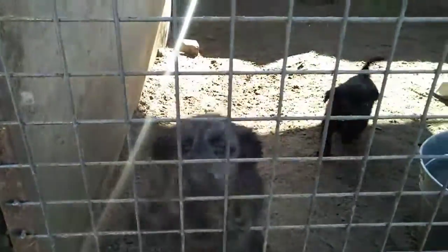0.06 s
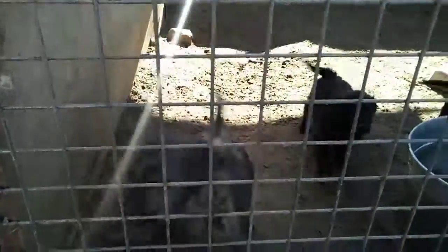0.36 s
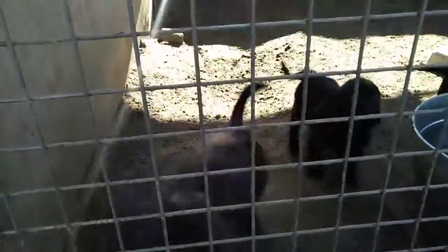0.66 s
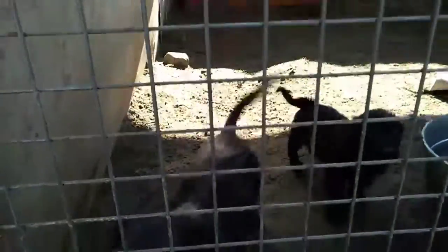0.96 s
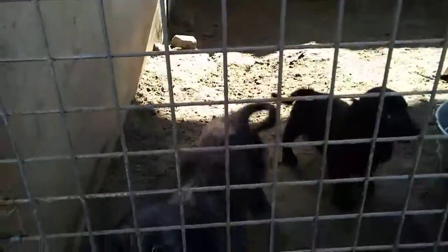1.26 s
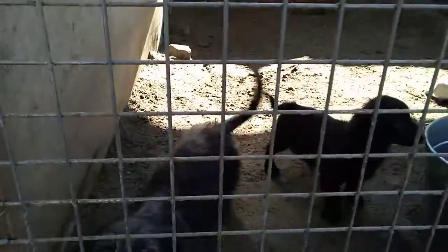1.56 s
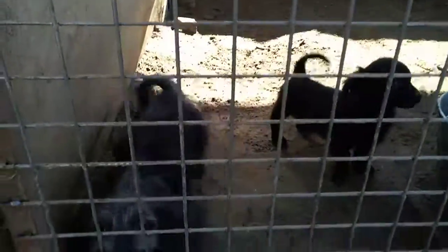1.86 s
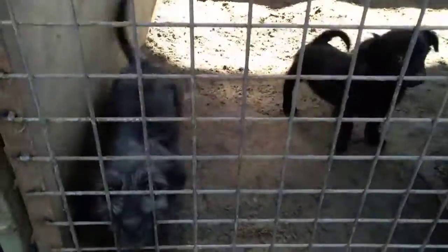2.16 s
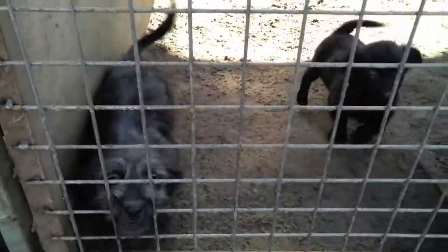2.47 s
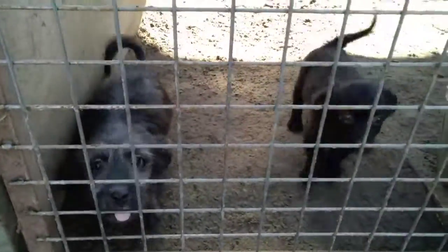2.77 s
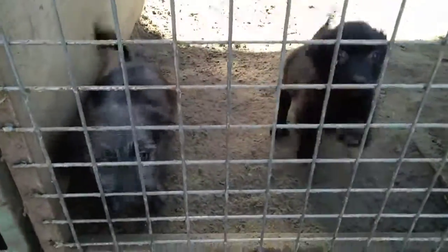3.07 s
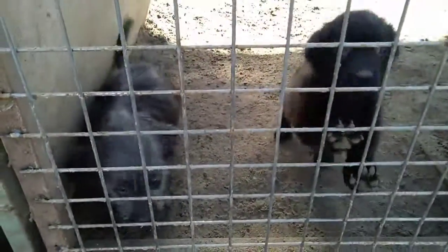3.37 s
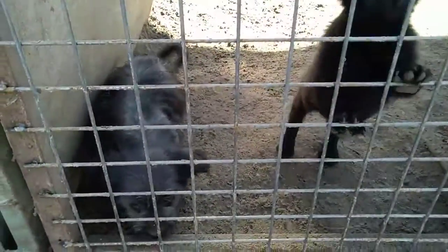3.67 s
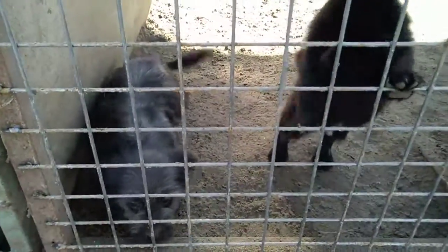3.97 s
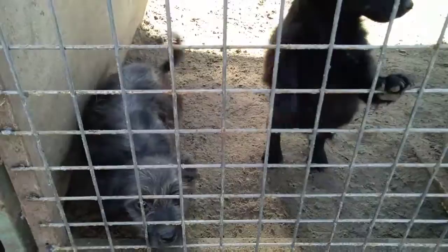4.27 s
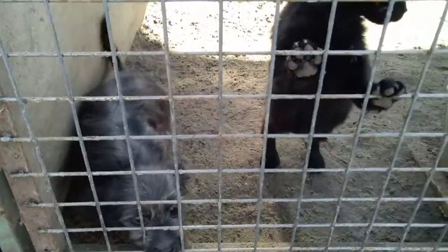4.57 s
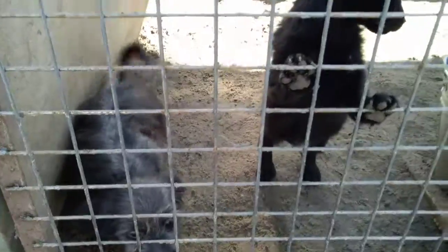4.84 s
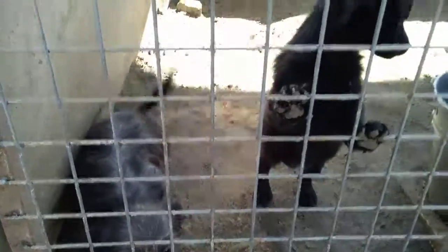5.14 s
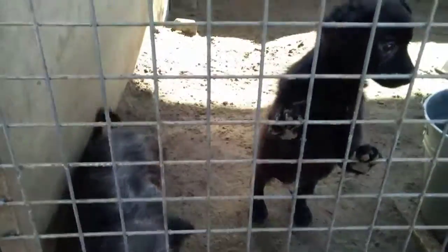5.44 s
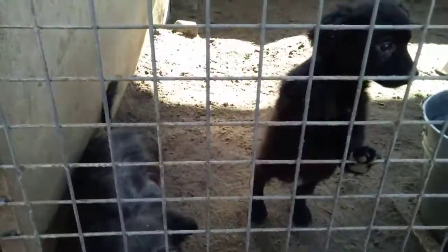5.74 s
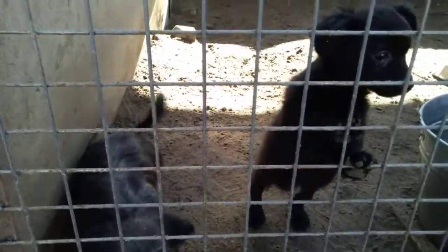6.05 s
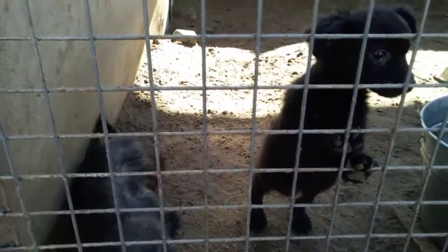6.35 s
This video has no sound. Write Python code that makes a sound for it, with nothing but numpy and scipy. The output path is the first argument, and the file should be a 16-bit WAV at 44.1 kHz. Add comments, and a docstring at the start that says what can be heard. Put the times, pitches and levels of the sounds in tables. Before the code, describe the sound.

Two puppies whine and yelp close to the microphone at a wire kennel fence in a quiet yard. Short whimpers and puffs of breath come first, then a run of thin, high, gliding whines. Paws knock softly on the mesh from about two seconds on. Near the end the calls fade to faint whimpers, paws scuff, a distant bird chirps faintly twice and a low rumble swells.

```python
"""At a wire kennel fence in a quiet yard, two puppies whine and yelp close by.
Their vocal folds give thin gliding tones, filtered by throat, nose and mouth, in a hiss of turbulent air.
Paws knock the mesh into damped vibration and scuff the dirt; the walls add a short reverberation.
A bird chirps faintly twice, and a low rumble swells near the end."""
import sys
import numpy as np
from scipy import signal
from scipy.fft import rfft, irfft, next_fast_len
from scipy.io import wavfile
from scipy.ndimage import uniform_filter1d, map_coordinates

SR = 44100
rng = np.random.default_rng(int(sys.argv[2]) if len(sys.argv) > 2 else 0)


def dump(signal):
    """Clip the signal to [-1, 1] and save it as 16-bit WAV at the path in sys.argv[1]."""
    limited = np.clip(np.atleast_2d(signal).T, -1, 1)
    pcm = np.round(limited * 32767).astype(np.int16)
    wavfile.write(sys.argv[1], SR, pcm)


N = 282681
TOP_HZ = 14250  # upper band limit

# puffs of air through the muzzle: start_s, length_s, t60_s, mouth_huff_db, nasal_hiss_db
BREATHS = [(0.01, 0.25, .3, -70, -59.5), (0.2, 0.011, 0.19, -53, -48), (0.3, 0.1, 0.33, -61.5, -55),
           (0.583, 0.011, 0.31, -42.5, -53), (0.63, 0.083, 0.29, -75.5, -49),
           (0.755, 0.029, 0.22, -57.5, -63), (0.92, 0.025, 0.21, -71.5, -78),
           (1.105, 0.014, 0.21, -76.5, -64), (1.335, 0.02, 0.89, -51.5, -61.5),
           (1.87, 0.057, 0.6, -57.5, -58), (2.165, .13, 0.8, -57, -59), (2.54, 0.063, 0.38, -48, -51.5),
           (2.86, 0.015, 0.21, -51.5, -58), (3.07, 0.025, 0.39, -58, -62), (3.21, .015, 0.3, -73, -62.5),
           (3.305, .03, .15, -99, -63), (3.445, .012, 0.23, -55.5, -51.5),
           (3.545, 0.0162, 0.26, -69.5, -66), (3.7, 0.0404, 0.26, -92, -79),
           (3.875, 0.0089, 0.34, -76.5, -59.5), (3.985, 0.02, 0.27, -85, -69.5),
           (4.315, 0.014, 0.098, -79, -69.5), (4.538, .012, 0.099, -57, -56.5),
           (4.85, 0.038, 0.63, -62.5, -64)]
BREATH_ATTACK_S = 0.053


def whine(contour, second_db, third_db, nose_hz, top_db):
    """Source and filter: tight folds give a strong fundamental; a nasal resonance picks out overtones."""
    # response of throat and nose: frequency_hz, gain_db
    throat = [(1800, 14.5), (2700, 2.5), (3800, 4), (5700, -0.5), (7000, -7.5), (8000, -26.5), (9000, -9),
              (10300, -14.5), (12500, -18), (14200, -33)]
    # mouth openings that lift the second harmonic: start_s, length_s, lift_db
    openings = [(0.201, 0.026, 10.5), (1.339, 0.015, 10), (1.732, 0.12, 18.5), (1.825, 0.054, 24),
                (2.155, .17, 16.5)]
    # hiss inside a whine: frequency_hz, gain_db
    leak_spectrum = [(1500, -17), (2100, -14.5), (3000, -11.5), (4200, -10), (6000, -4.5), (7200, -3),
                     (8200, -11), (11000, -8.5), (14200, -13.5)]
    t = np.arange(contour[0][0], contour[-1][0], 1 / SR)
    n = len(t)
    pitch, first_db, upper_db = curves(contour, t)
    resonance_hz = nose_hz * (pitch / 1000) ** 0.77
    lifts = [lift * envelope(t, s, length, attack=0.0311, fade=0.22) for s, length, lift in openings]
    opened_db = np.minimum(second_db + np.max(lifts, axis=0), first_db + 10)
    # the folds vibrate less evenly at low pitch and while the voice starts or breaks off
    to_edge_s = np.minimum(t - t[0], t[-1] - t)
    slack = 1000 / pitch * (1 + np.exp(-to_edge_s / 0.0034))
    jitter = 0.006 * slack * wobble(450, n)
    quaver = 0.0079 * wobble(70, n)
    pitch = pitch * (1 + jitter + quaver)
    phase = 2 * np.pi * np.cumsum(pitch) / SR
    k = np.arange(1, 21)[:, None]
    upper_hz = k[3:] * pitch
    # each whine starts dull and brightens as the pressure builds
    dull_db = 14 * np.exp(-(t - t[0]) / 0.027)
    throat_db = along(throat, upper_hz * np.sqrt(5200 / resonance_hz))
    throat_db += along([(7000, 0.016), (9000, top_db)], upper_hz)
    throat_db -= dull_db * np.maximum(np.log2(upper_hz / 6000), 0)
    nose_db = 9 * np.exp(-((upper_hz - resonance_hz) / 520) ** 2)
    # the moving muzzle makes every overtone come and go
    flutter_db = 3 * np.array([wobble(35, n) for _ in k[1:]])
    low = amp([first_db, opened_db + flutter_db[0] / 2, upper_db + third_db + flutter_db[1]])
    high = amp(throat_db + nose_db + flutter_db[2:]) * (upper_hz < TOP_HZ)
    high = high / np.linalg.norm(high, axis=0) * amp(upper_db)
    # the more air is puffed past the folds, the raspier the voice
    airy = np.minimum(strokes(BREATHS, BREATH_ATTACK_S, t)[1] / amp(first_db), 0.4)
    rasp_db = 4 * airy * wobble(450, n)
    tremor_db = 1.5 * wobble(40.64, n)
    period_doubling = 1 + 0.56 * airy * np.cos(phase / 2)
    # turbulence frays the highest overtones into narrow bands of noise
    fray_depth = (0.8 + 4 * airy) * slack * (k * pitch / 13000) ** 2
    fray = fray_depth * np.array([wobble(700, n) for _ in k])
    tone = np.sqrt(2) * np.sum(np.vstack([low, high]) * np.sin(k * phase + fray), axis=0)
    leak = amp(upper_db - 21 - dull_db / 2) * noise(leak_spectrum, n)
    gate = np.clip(to_edge_s / 0.0044, 0, 1)
    return (tone * amp(rasp_db + tremor_db) * period_doubling + leak) * gate


def yelp(length, start_hz, middle_hz, end_hz, level_db, fall_db, roughness):
    """Mouth formants shape a harmonic series; random pitch and amplitude modulation roughen it."""
    # response of the open mouth: frequency_hz, gain_db
    mouth = [(350, -1.5), (600, 4), (1350, 1.5), (1900, -3.5), (2500, -31.5), (4200, -9.5), (7000, -38),
             (14000, -64)]
    pitch, swell = arch(length, start_hz, middle_hz, end_hz)
    n = len(pitch)
    waver = roughness * (0.05 * wobble(500, n) + 0.04 * wobble(70, n))
    phase = 2 * np.pi * np.cumsum(pitch * (1 + waver)) / SR
    k = np.arange(1, 10)[:, None]
    gains = amp(along(mouth, k * pitch) - fall_db * (k - 1))
    tone = np.sum(gains * np.sin(k * phase), axis=0)
    shimmer = amp(1.7 * roughness * wobble(350, n))
    return amp(level_db + 3.5) * swell * unit(tone * shimmer)


def voices():
    """The puppies' whines and yelps add by linear superposition."""
    # one contour per whine, each point: time_s, pitch_hz, fundamental_db, upper_overtones_db
    contours = [
        [(0.187, 469.7, -42, -61.5), (0.213, 534.8, -34, -46), (0.255, 692, -38.5, -47.5),
         (0.313, 752, -47.5, -45), (0.369, 701, -42, -50.5), (0.378, 780, -69.5, -65.5)],
        [(1.347, 1214, -36, -62), (1.367, 1232, -36.5, -54.5), (1.391, 1290, -29, -60.5),
         (1.477, 1272, -25.5, -56), (1.533, 1270, -32.5, -59.5), (1.545, 1250, -32.5, -46),
         (1.595, 1243, -28.5, -47), (1.643, 1247, -27.5, -46.5), (1.695, 1161, -37, -42),
         (1.777, 1178, -34.5, -37.5), (1.859, 1060, -42, -40), (1.897, 941, -40.5, -43)],
        [(2.143, 1099, -50.5, -64), (2.167, 1113, -42, -61), (2.265, 1146, -32.5, -44.5),
         (2.309, 1079, -42, -52), (2.415, 915.2, -37, -44.5), (2.441, 889, -36, -50),
         (2.513, 786.3, -38.5, -47.5), (2.555, 778, -37, -41.5), (2.621, 756, -37, -50), (2.65, 738, -52, -63)],
        [(3.06, 637, -51, -72), (3.112, 833, -42.5, -57), (3.128, 1044, -38.5, -49.5),
         (3.15, 1065, -39.5, -48.5), (3.174, 948, -43.5, -49.5), (3.224, 998, -42.5, -52)],
        [(3.455, 995.1, -46, -49.5), (3.471, 1149, -44.5, -43), (3.489, 1139, -37.5, -46),
         (3.507, 1243, -38.5, -50.5), (3.551, 1127, -39, -49), (3.57, 1161, -62, -76)],
        [(3.878, 991.3, -77, -43), (3.898, 1163, -39.5, -60.5), (3.928, 1195, -40.5, -49),
         (3.98, 1216, -38.5, -53.5), (4.005, 1167, -60, -65)],
        [(4.548, 974, -60, -49.5), (4.558, 993, -52, -46), (4.568, 1143, -36.5, -49),
         (4.58, 1163, -37.5, -52.5), (4.592, 1226, -36.5, -47), (4.624, 1272, -39.5, -42.5),
         (4.638, 1285, -37.5, -44.5), (4.68, 1267, -36, -40), (4.832, 1278, -35, -39),
         (4.864, 1239, -34.5, -44), (4.876, 1188, -34.5, -48), (4.888, 1200, -60, -52)],
    ]
    # timbre of each whine: second_harmonic_db, third_re_upper_db, resonance_at_1khz_pitch_hz, top_lift_db
    timbres = [(-55, -16, 7400, -4.5), (-55, -13.5, 4520, -4), (-58.5, -11.5, 4900, 3),
               (-63.5, -23, 6000, 1.5), (-64, -15, 5300, 3.5), (-58, -14, 4700, 4), (-61, -6, 4680, -8)]
    # yelps and whimpers:
    # start_s, length_s, start_hz, middle_hz, end_hz, relative_db, fall_per_harmonic_db, roughness
    yelps = [(0.014, 0.062, 987, 936, 997, -59.5, 10, 0.41), (0.168, 0.044, 427, 535, 648, -48, 21, 1.1),
             (0.571, 0.034, 455, 695, 523, -34.5, 7.5, 0.63),
             (0.616, 0.015, 668, 609, 566, -46, -1.5, 1.06), (0.743, 0.039, 520, 544, 610, -55, 8.5, 0.8),
             (0.937, 0.02, 632, 684, 860, -61, 44, 0.4), (1.099, 0.035, 728, 773, 840, -52.5, 12, 0.47),
             (1.116, 0.015, 1015, 922, 995, -48, 29, 0.27), (1.291, 0.061, 534, 578, 696, -47.5, 6, 0.08),
             (1.333, 0.089, 595, 550.4, 587, -40, 38, 0), (1.345, 0.02, 3200, 3377, 3620, -47, 16.5, 0.9),
             (1.417, 0.12, 635, 679, 757, -52, 24, 0.36), (2.013, 0.114, 525, 470, 524, -69.5, 29, 0.4),
             (2.136, 0.052, 380, 369.5, 380, -54, -3.5, 0.38),
             (2.407, 0.097, 718, 549, 492, -44.5, 9, 0.35),
             (2.508, 0.251, 385.3, 373.3, 388, -54.5, 5, 0.7), (2.649, 0.042, 486, 564, 620, -44, 34, 0.4),
             (2.685, 0.079, 744, 739, 800, -50.5, 2.5, 0.65),
             (2.839, 0.045, 630, 657.5, 601, -40.5, 0, 0.27), (2.967, 0.046, 880, 930, 886, -57, 28, 1.1),
             (3.435, 0.022, 1400, 1467, 1364, -49, 0, 0.74), (3.456, 0.069, 920, 945, 955, -53, 40, 0),
             (3.863, 0.025, 483, 491, 548, -56, 2, 0.43), (4.308, 0.019, 1037, 970, 893, -60.5, 24, 0.97),
             (4.537, 0.013, 1036, 1280, 1280, -50.5, 21, 1.1), (4.917, 0.1, 2360, 2474, 2340, -66, 19, 0),
             (5.767, 0.078, 990, 935, 1045, -57, 21, 0.52),
             (5.796, 0.18, 2470, 2440, 2280, -75.5, 20, 0.14),
             (5.934, 0.072, 1003, 919, 986, -64.5, 33.5, 0.4)]
    out = np.zeros(N)
    for contour, timbre in zip(contours, timbres):
        add(out, contour[0][0], whine(contour, *timbre))
    for s, *shape in yelps:
        add(out, s, yelp(*shape))
    return out


def puffs():
    """Turbulent flow through mouth and nose makes noise, mostly as a call starts or breaks off."""
    # breath through the open mouth: frequency_hz, gain_db
    huff_spectrum = [(150, -11.5), (350, -7.5), (600, -2.5), (1000, 0), (1500, -4), (2100, -11.5),
                     (2800, -18.5), (4000, -35)]
    # breath through the nose: frequency_hz, gain_db
    hiss_spectrum = [(1500, -18.5), (2100, -5), (2500, -11), (2950, -14), (3500, -4), (4700, -5.5),
                     (5700, -3), (6500, -7), (7050, -3), (7600, -15.5), (9300, -13.5), (10000, -23),
                     (14200, -31.5)]
    huff, hiss = strokes(BREATHS, BREATH_ATTACK_S, np.arange(N) / SR)
    mouth = huff * amp(2 * wobble(120, N)) * patchy(noise(huff_spectrum), depth_db=3)
    nose = hiss * amp(-1 + 0.8 * wobble(90, N)) * patchy(noise(hiss_spectrum), depth_db=3)
    return mouth + nose


def paws(thud_gain_db=5, click_gain_db=13, click_t60_s=0.0036, rattle_db=-16, rattle_t60_s=0.14):
    """Impact excitation: a soft pad rings the fence's damped modes, a claw clicks, the mesh rattles."""
    # paws striking the mesh: start_s, relative_thud_db, relative_click_db
    knocks = [(2.213, -36, -42), (2.622, -41.5, -47.5), (3.033, -38.5, -52), (3.391, -50, -45.5),
              (3.768, -59.5, -54.5), (4.134, -64.5, -61.5), (4.384, -83, -67.5), (4.486, -40.5, -50.5),
              (4.912, -48.5, -55.5), (5.042, -82, -54), (5.312, -35, -35), (5.756, -50, -47),
              (6.17, -71, -70), (6.248, -48.5, -57.5)]
    # modes of the fence: frequency_hz, level_db, t60_s
    modes = [(113, -5, 0.14), (157.1, 3, 0.082), (259.5, -6, 0.088), (397, -7, 0.077), (581, 0.5, 0.032)]
    # claw on wire: frequency_hz, gain_db
    click_spectrum = [(200, 10), (600, -3), (1400, 4), (2300, -2.5), (3300, -10.5), (4500, -21),
                      (8000, -30), (14000, -54.5)]
    thuds, clicks = np.zeros(N), np.zeros(N)
    t = np.arange(SR // 4) / SR
    pad_rise = 1 - np.exp(-t / 0.0024)
    click_decay = amp(-60 * t / click_t60_s) + amp(rattle_db - 60 * t / rattle_t60_s)
    for s, thud_db, click_db in knocks:
        ring = np.zeros(len(t))
        for hz, db, t60 in modes:
            decay = amp(db + rng.normal(0, 3.4) - 60 * t / t60)
            ring += decay * np.sin(2 * np.pi * hz * rng.normal(1, 0.11) * t)
        add(thuds, s + 0.00041, amp(thud_db + thud_gain_db) * ring * pad_rise)
        burst = rng.standard_normal(len(t)) * click_decay
        add(clicks, s + 0.001, amp(click_db + click_gain_db) * burst)
    return thuds + filtered(clicks, lambda hz: unit(amp(along(click_spectrum, hz))))


def scuffs(attack_s=0.13):
    """Sliding friction of paws and fur on mesh and dirt makes grainy noise."""
    # sliding movements: start_s, length_s, t60_s, relative_rub_db, relative_grit_db
    slides = [(4.485, .04, 0.15, -70.5, -90), (5.06, 0.086, 0.22, -68, -66), (5.2, 0.083, 0.65, -55, -93.5),
              (5.285, 0.042, 0.25, -49, -54), (5.39, 0.1, 0.33, -58.5, -61.5), (5.5, 0.067, 0.21, -86, -60),
              (5.78, 0.024, .35, -60, -65), (6.395, .015, .2, -74, -56.5)]
    # dull rubbing: frequency_hz, gain_db
    rub_spectrum = [(100, -2), (300, 9), (600, 4), (1100, -3.5), (2400, -9.5), (4000, -19), (8000, -44.5)]
    # bright grit: frequency_hz, gain_db
    grit_spectrum = [(1000, -2.5), (2500, -3), (4500, -1), (6500, 1), (9000, -14), (12000, -20.5),
                     (14200, -17.5)]
    rub, grit = strokes(slides, attack_s, np.arange(N) / SR)
    grainy = lambda spectrum: unit(patchy(noise(spectrum), depth_db=5) * amp(1.5 * wobble(400, N)))
    return rub * amp(2) * grainy(rub_spectrum) + grit * amp(-1) * grainy(grit_spectrum)


def kennel(x):
    """Reverberation: reflections from the walls form a short tail that dies faster in the treble."""
    # reverberation times: frequency_hz, t60_s
    decay_times = [(200, 0.97), (1000, 0.23), (4000, 0.24), (12000, 0.07)]
    hz, t, bands = signal.stft(rng.standard_normal(SR // 2), SR, nperseg=256)
    decay = amp(-60 * t / along(decay_times, hz)[:, None])
    tail = signal.istft(bands * decay, SR, nperseg=256)[1]
    delayed = np.pad(x, (300, 0))
    return signal.fftconvolve(delayed, tail / np.linalg.norm(tail))[:N]


def bird():
    """A distant bird's thin chirps are frequency-modulated pure tones."""
    # chirps: start_s, length_s, start_hz, middle_hz, end_hz, level_db
    chirps = [(5.41, 0.042, 9700, 8850, 9100, -56), (5.547, 0.071, 8800, 8770, 8270, -59)]
    out = np.zeros(N)
    for s, *shape, db in chirps:
        pitch, swell = arch(*shape)
        add(out, s, amp(db) * swell * np.sin(2 * np.pi * np.cumsum(pitch) / SR))
    return out


def background(yard_db=-80, rumble_floor_db=-81):
    """Amplitude-modulated low noise rumbles over the steady noise floor of the yard."""
    # swells of the rumble: start_s, length_s, level_db
    rumbles = [(2.262, 0.22, -66), (3.981, 0.013, -41.5), (4.485, 0.086, -54), (5.375, .13, -45),
               (5.939, 0.083, -48), (6.1, 0.25, -47), (6.368, 0.11, -28)]
    # low rumble: frequency_hz, gain_db
    rumble_spectrum = [(25, -34.5), (44, -8), (62, 0.5), (85, -1.5), (135, -16.5), (220, -27.5),
                       (500, -71.5)]
    # ambient noise: frequency_hz, gain_db
    yard_spectrum = [(30, 7.5), (100, 8.5), (300, -7.5), (1000, -8), (2500, -14), (6000, -18),
                     (10000, -17.5), (14200, -33.5)]
    t = np.arange(N) / SR
    swells = sum(amp(db) * envelope(t, s, length, attack=0.056, fade=0.13) for s, length, db in rumbles)
    return (amp(rumble_floor_db) + swells) * noise(rumble_spectrum) + amp(yard_db) * noise(yard_spectrum)


def amp(db):
    """Decibels to amplitude ratio."""
    return 10 ** (np.asarray(db) / 20)


def unit(x):
    """Normalise to rms 1."""
    return x / np.sqrt(np.mean(x ** 2) + 1e-20)


def along(points, hz):
    """Interpolate (frequency_hz, value) points on a logarithmic frequency axis."""
    knots_hz, values = np.transpose(points)
    return np.interp(np.log(hz + 1), np.log(knots_hz), values)


def curves(rows, t):
    """Interpolate each column after time_s at the times t."""
    times, *columns = np.transpose(rows)
    return [np.interp(t, times, column) for column in columns]


def wobble(rate, size):
    """Smooth random modulation: a spline through rate knots a second."""
    knots = rng.standard_normal(int(size * rate / SR) + 4)
    return map_coordinates(knots, [np.arange(size) * rate / SR])


def filtered(x, response):
    """Linear filtering: multiply the spectrum of x by a frequency response."""
    size = next_fast_len(x.shape[-1] + 8192)
    gain = response(np.fft.rfftfreq(size, 1 / SR))
    return irfft(rfft(x, size) * gain, size)[..., :x.shape[-1]]


def noise(spectrum, size=N):
    """White noise filtered to a spectrum, at rms 1."""
    return unit(filtered(rng.standard_normal(size), lambda hz: amp(along(spectrum, hz))))


def patchy(x, depth_db):
    """Random modulation makes each band of a noise swell and fade on its own, as in turbulence."""
    bands = signal.stft(x, nperseg=512)[2]
    field = uniform_filter1d(rng.standard_normal(bands.shape), size=4, axis=0)
    field = unit(uniform_filter1d(field, size=7, axis=1))
    return unit(signal.istft(bands * amp(depth_db * field), nperseg=512)[1][:len(x)])


def arch(length, start_hz, middle_hz, end_hz):
    """Parabolic pitch glide and arched amplitude of one short note."""
    progress = np.linspace(0, 1, int(max(length, 0.005) * SR))
    parabola = np.polyfit([0, 0.5, 1], [start_hz, middle_hz, end_hz], 2)
    return np.polyval(parabola, progress), np.abs(np.sin(np.pi * progress)) ** 0.57


def envelope(t, s, length, attack, fade):
    """Exponential rise up to s, hold for length, then decay; attack and fade are seconds per 60 dB."""
    before = np.maximum(s - t, 0) / attack
    after = np.maximum(t - s - length, 0) / fade
    return amp(-60 * (before + after).clip(0, 3))


def strokes(rows, attack, t):
    """Incoherent events add in power: two gains from rows of start_s, length_s, t60_s, low_db, high_db."""
    power = sum((amp(levels)[:, None] * envelope(t, s, length, attack, fade)) ** 2
                for s, length, fade, *levels in rows)
    return np.sqrt(power)


def add(track, s, sound):
    """Superpose a sound on the track at s seconds."""
    part = track[max(round(s * SR), 0):][:len(sound)]
    part += sound[:len(part)]


def scene(wet_db=-25):
    """Direct sound, reverberation and background add; identical channels give a central image."""
    near = voices() + puffs() + paws() + scuffs()
    mono = near + amp(wet_db) * kennel(near) + bird() + background()
    return np.array([mono, mono])


def record(dry):
    """An ideal low-pass filter removes everything above the band limit."""
    return filtered(dry, lambda hz: hz < TOP_HZ)


dry = scene()
out = record(dry)
dump(out)
```